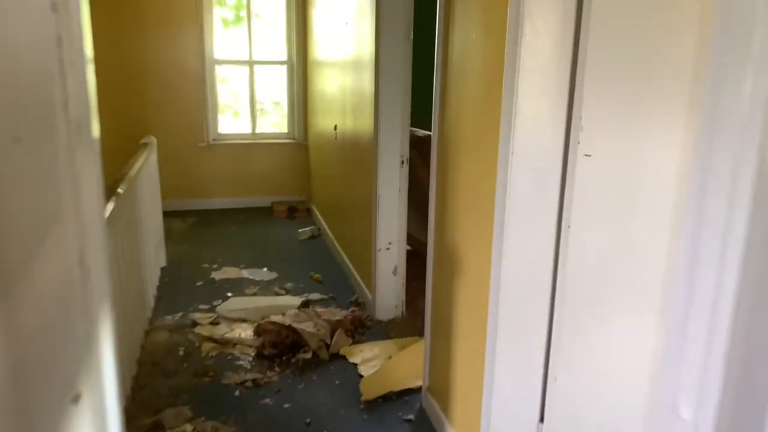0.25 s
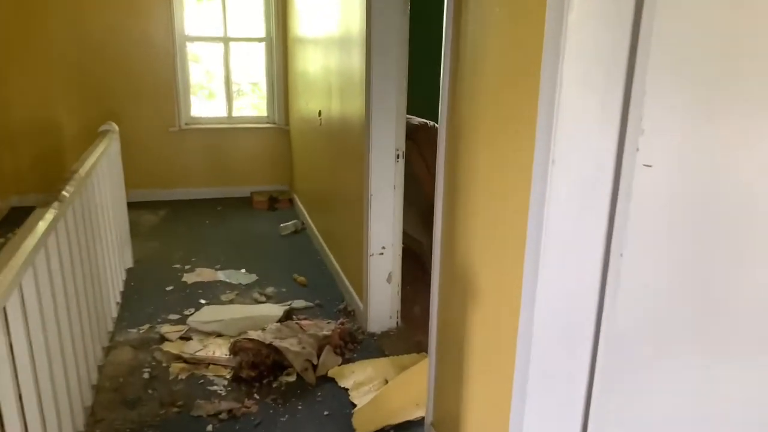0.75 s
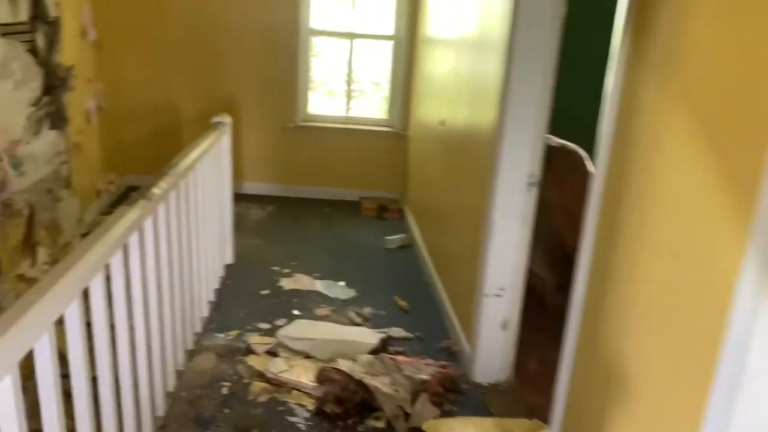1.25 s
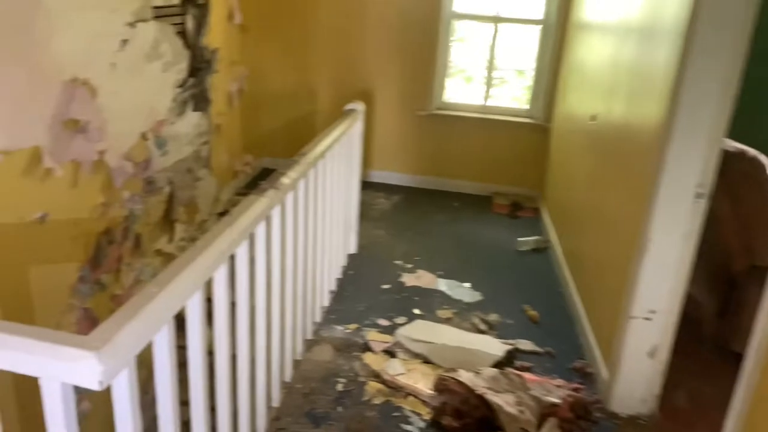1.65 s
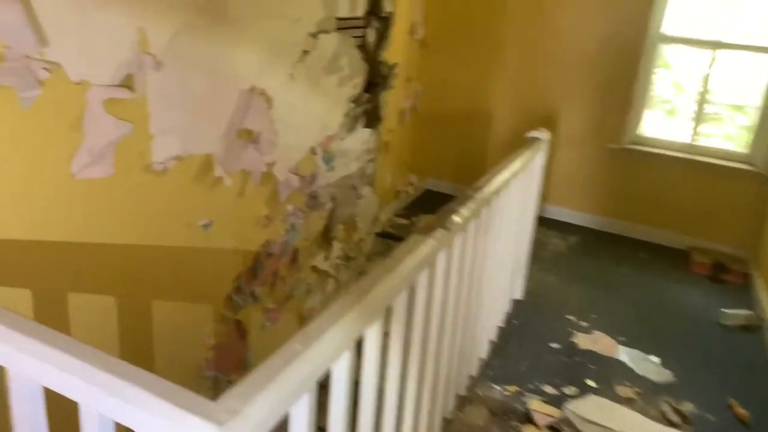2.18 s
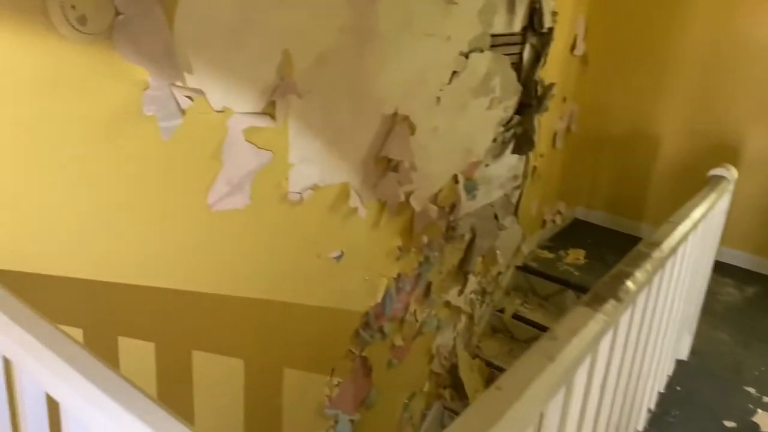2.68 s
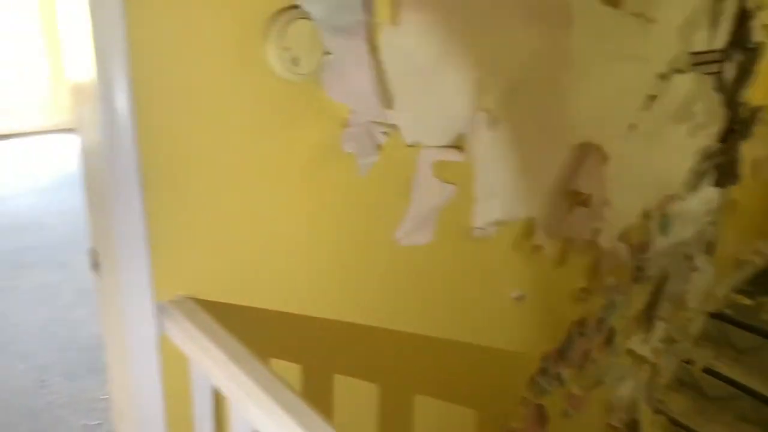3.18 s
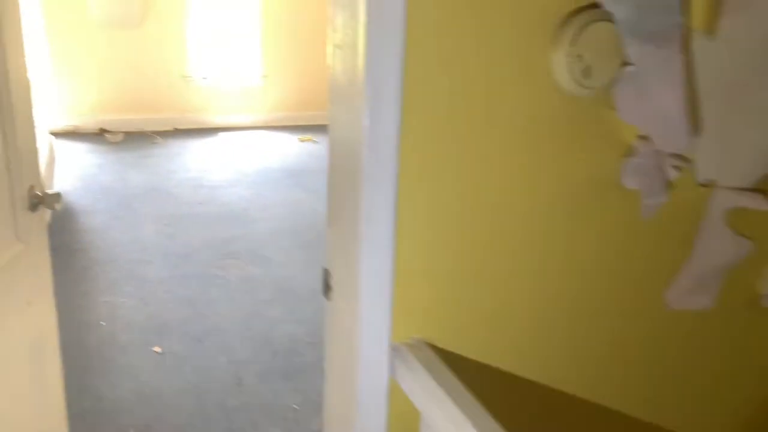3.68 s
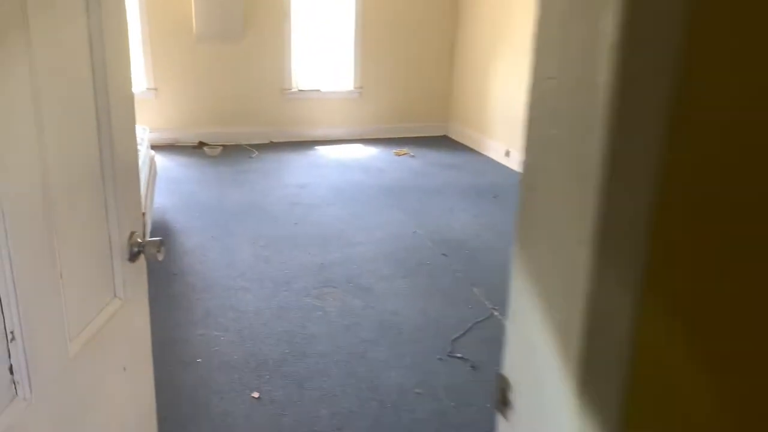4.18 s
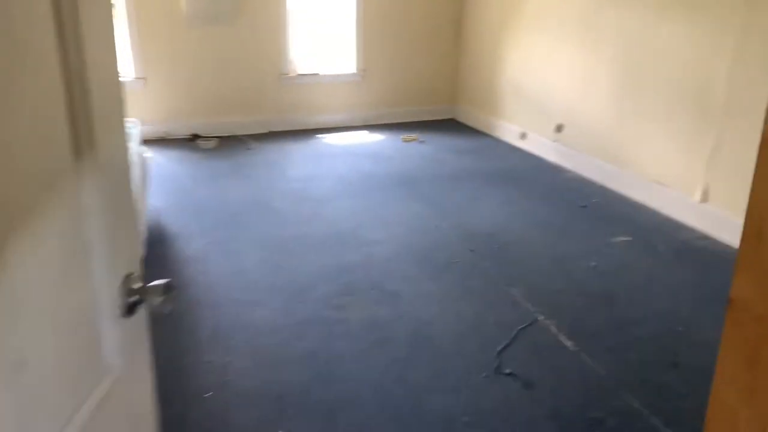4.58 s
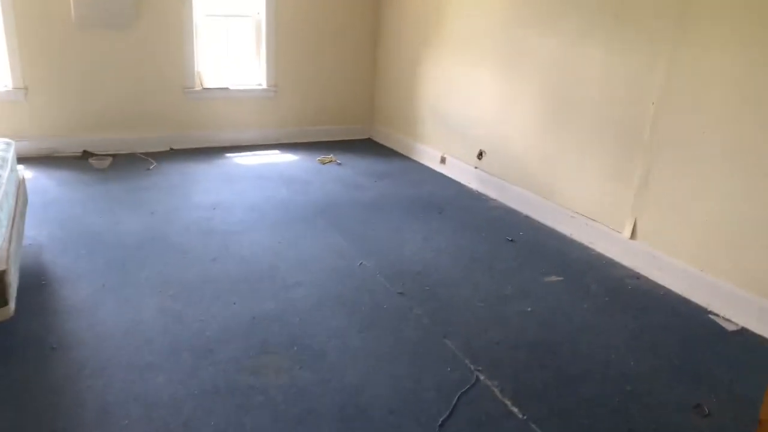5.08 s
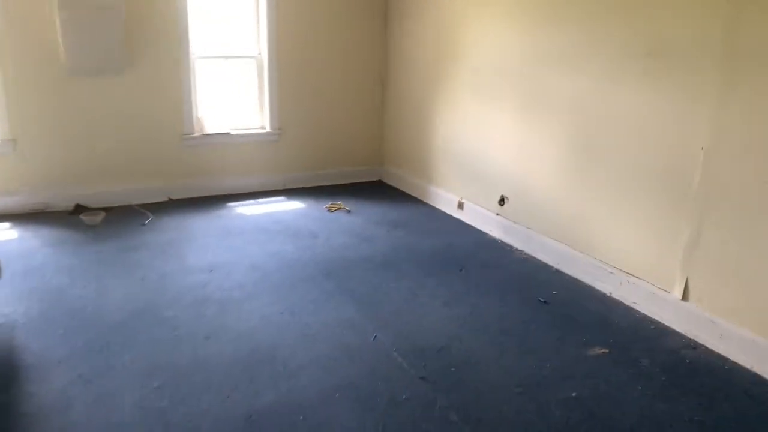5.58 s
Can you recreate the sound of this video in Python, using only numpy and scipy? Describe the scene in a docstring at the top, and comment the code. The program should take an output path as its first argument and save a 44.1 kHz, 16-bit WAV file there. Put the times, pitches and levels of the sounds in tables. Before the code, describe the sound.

On a bare landing, a soft dull footfall leads straight into a loud kick of loose debris, which cracks, bounces and scrapes for under a second. Smaller shoe knocks and scuffs follow, then a light metal jingle near four seconds and faint carpet steps. Short echo off bare walls, heard close from a hand-held phone.

```python
"""Bare landing and empty room, carpet over old floorboards: slow steps, heard from a hand-held phone.
Thuds are short bending tones; knocks and scrapes are clumped grain noise under force envelopes.
A loose piece is kicked and bounces, contacts tick, a small metal part rattles once as decaying sines.
Bare walls return a short noise tail; joists rumble, shaped noise gives faint house air and microphone hiss."""
import sys
import numpy as np
from scipy import signal
from scipy.fft import rfft, irfft, next_fast_len
from scipy.io import wavfile
from scipy.ndimage import uniform_filter1d

SR = 44100
rng = np.random.default_rng(int(sys.argv[2]) if len(sys.argv) > 2 else 0)


def gain_from_db(level_db):
    """Turn a decibel level (scalar or array-like) into a linear amplitude factor."""
    decades = np.asarray(level_db, float) / 20
    return 10 ** decades


def file_out(sig):
    """Save sig as 16-bit WAV at sys.argv[1]."""
    # one column per channel
    cols = np.atleast_2d(sig).T
    # limit, then scale
    lim = np.clip(cols, -1, 1)
    pcm = np.round(lim * 32767).astype(np.int16)
    wavfile.write(sys.argv[1], SR, pcm)


N = 257984
T = np.arange(N) / SR
SIZE = next_fast_len(N + SR)
HZ = np.maximum(np.arange(SIZE // 2 + 1) * SR / SIZE, 1)

# air and hiss spectrum, relative: f/Hz, density/dB per Hz
QUIET_SPECTRUM = [(24, -14.5), (42, 1.5), (70, 6), (140, -11), (400, -20.5), (1000, -27.5), (2500, -34),
                  (6000, -37.5), (9000, -36), (13000, -36.5), (15800, -50.5)]
# wall tail by octave: f/Hz, t60/s, level/dB
ROOM_TAIL = [(140, 0.17, -7.5), (240, 0.53, -2), (544, 0.4, -5), (960, 0.22, -0.5), (1880, 0.18, -8),
             (4530, 0.31, 1), (8000, 0.32, -1.5), (13100, 0.37, -11.5)]
# left-right likeness: f/Hz, likeness/1
LIKENESS = [(60, .94), (170, .99), (350, .88), (600, .6), (1200, .42), (4000, 0), (6000, .2), (8300, .95),
            (16000, .97)]
# strikes of the metal part: t/s, level/dB, tilt/dB per octave
METAL_STRIKES = [(3.9235, -44.5, 1.5), (3.9709, -44.5, 10.5), (3.9932, -45.5, 6), (4.0344, -53, -6),
                 (4.078, -62.5, -6)]
# metal modes: f/Hz, level/dB, t60/s
METAL_MODES = [(3624, 2, 0.15), (5276, -5, 0.16), (7600, -11, 0.16), (7950, -1.5, 0.11), (9130, -4, 0.12),
               (10200, -12, 0.17), (13940, -16, 0.098)]
# soles and the kicked loose piece scraping over carpet and grit:
# t/s, rub/dB, grit against rub/dB, rise/ms, rub f/Hz
SCRAPES = [(0.185, -70.5, -5, 46, 1210), (0.278, -67, -12, 30, 1350), (0.225, -70, -34, 20, 301),
           (0.468, -76, 1, 17, 1360), (0.776, -41, -11.5, 38, 1130), (1.148, -35.5, -26, 35.6, 1310),
           (1.246, -47.5, -46, 69, 617), (1.781, -57, -19.5, 15.7, 1116), (2.149, -69.5, -21.5, 134, 1510),
           (2.41, -58, -25, 65, 618), (2.5, -60.5, -19, 65, 505), (2.61, -63, -35, 30.4, 756),
           (3.56, -65.5, -22, 160, 897), (3.698, -58.5, -16.5, 25.8, 1540), (3.966, -71, 2, 25, 1230),
           (4.29, -80.5, -23.5, 45, 1493), (4.361, -68.5, -8.5, 36, 1350), (4.45, -74.5, -24, 54, 1500),
           (4.558, -71.5, -22, 17, 1380), (5.28, -71.5, -19, 32, 1176), (5.349, -49, -55, 18, 710),
           (5.4, -60, -40, 42, 745), (5.765, -63.5, -50, 26, 472)]
# carpet rub spectrum, relative: f/Hz, level/dB
CARPET_SPECTRUM = [(200, -22.5), (450, 0.5), (900, -3), (1600, 0), (2300, -5), (4000, -38)]
# snap spectrum, relative: f/Hz, level/dB
SNAP_SPECTRUM = [(1300, -16.5), (2200, -0.5), (3000, -4.5), (4300, -7), (6000, -18), (9000, -29.5)]
# grit spectrum, relative: f/Hz, level/dB
GRIT_SPECTRUM = [(2500, -24), (4000, -6), (6500, 1), (8500, -2), (11000, -1.5), (13500, -3), (15800, -18.5)]
# short sharp ticks of contacts, some at the loose piece's landings: t/s, peak/dB, f/Hz
CONTACT_TICKS = [(0.893, -16, 790), (1.156, -12.5, 2270), (1.1565, -9, 740), (1.356, -20.5, 1880),
                 (1.542, -39, 2600), (2.103, -38, 790), (4.149, -51, 674), (2.572, -29, 2720),
                 (3.654, -42.5, 1450), (3.897, -48.5, 1710), (4.597, -55, 7600), (5.339, -41, 3360),
                 (5.341, -37, 1255), (5.786, -54, 2005), (5.787, -52, 3130)]
# wood modes before blow scatter: f/Hz, level/dB, t60/s
WOOD_MODES = [(164.5, 5, 0.11), (240, 1.5, 0.17), (304, -3.5, 0.082), (361, 7, 0.03), (427, 0, 0.078),
              (577, 8.5, 0.025), (623, -2, 0.088)]
# hard contacts of the shoes: t/s, crack/dB, wood/dB, grit/dB, wood f/Hz
SHOE_KNOCKS = [(0.165, -55.5, -40, -50.5, 290), (0.311, -45.5, -45, -54.5, 215),
               (0.508, -56, -93.5, -50, 250), (1.682, -45.5, -45, -63.5, 272),
               (1.748, -33, -57.5, -84, 766), (1.913, -49.5, -42, -73, 313),
               (1.985, -56.5, -43, -79, 200.5), (2.064, -47.5, -29, -66, 455), (2.102, -50, -31, -78, 370),
               (2.379, -36.5, -29.5, -57.5, 240), (2.565, -30.5, -37, -43.5, 240),
               (2.583, -38.5, -30, -52, 413), (2.882, -59.5, -73, -52, 617),
               (3.427, -52.5, -43.5, -61, 242), (3.464, -48, -43.5, -76, 415),
               (3.921, -49.5, -35, -54.5, 272.3), (3.975, -63, -40.5, -66, 315),
               (4.04, -56.5, -40, -78, 287), (4.146, -72, -42.5, -100, 267), (5.336, -34, -27, -61.5, 480),
               (5.761, -71, -44, -97, 380)]
# shoe crack spectrum, relative: f/Hz, level/dB
SHOE_CRACK = [(450, -0.5), (800, 1.5), (1300, -1), (1900, -5), (2600, -10.5), (4000, -37.5)]
# kick and landings of the loose piece: t/s, crack/dB, wood/dB, grit/dB, wood f/Hz
DEBRIS_BOUNCES = [(0.698, -20, -19.5, -24, 646), (0.706, -7.5, -8, -22.5, 432.3),
                  (0.724, -9, -4.5, -20, 340), (0.747, -18.5, -26, -11.5, 374.7),
                  (0.872, -58, -45, -27.5, 383), (0.894, -27.5, -13, -38, 344.2),
                  (0.922, -32, -18, -42, 329), (0.933, -32, -24.5, -37, 435),
                  (0.962, -40.5, -24.5, -63, 406.6), (1.106, -48.5, -28, -41.5, 247),
                  (1.156, -18.5, -19, -18.5, 240), (1.193, -21.5, -22.5, -19.5, 406.2),
                  (1.245, -33, -25, -48, 253.8), (1.354, -21, -26.5, -30, 236.5),
                  (1.541, -31, -41, -25, 356)]
# loose-piece crack spectrum, relative: f/Hz, level/dB
DEBRIS_CRACK = [(550, -3.5), (820, -5.5), (1300, 1), (1900, -6.5), (2900, -8), (4500, -22), (8000, -40)]
# loose-piece modes: f/Hz, level/dB, t60/s
DEBRIS_MODES = [(1761, 0, .07), (2450, -6, .04), (2880, 0, .04), (3069, -4, .035)]
# low thuds of steps and of the kick in the boards: t/s, level/dB, starting f/Hz
FLOOR_THUDS = [(0.1715, -23, 168), (0.705, -20, 240), (0.924, -30, 98), (1.911, -27.5, 177.7),
               (1.973, -44, 123), (2.591, -38.5, 60.8), (3.446, -39.5, 95.7), (3.515, -47, 118),
               (3.611, -43, 81), (3.931, -31, 91), (4.125, -41.5, 222.3), (4.383, -41.5, 98.5),
               (4.552, -55, 110), (4.581, -54.5, 163.5), (4.77, -63, 75.3), (5.286, -41, 172.4),
               (5.324, -38.5, 82.8), (5.749, -56, 203.5)]

DENSE_DB, COARSE_DB, STRIKE_DB = 1.5, 2.5, 4  # spread of grain sizes


def table(points, hz=HZ):
    """Values of (Hz, value) points, joined on a log-frequency axis."""
    f, v = np.transpose(points)
    return np.interp(np.log(hz), np.log(f), v)


def shape(x, gain):
    """Apply a response given per frequency."""
    return irfft(rfft(x, SIZE) * gain, SIZE)[..., :N]


def unit(gain):
    """Scale a response so that white noise keeps its level."""
    return gain / np.sqrt(np.mean(np.abs(gain) ** 2))


def colour(points):
    """Level-keeping response from a (Hz, dB) table."""
    return unit(gain_from_db(table(points)))


def highpass(corner_hz):
    """Steep bass cut."""
    return 1 / (1 + (corner_hz / HZ) ** 4)


def band(low_hz, high_hz):
    """Steep band-pass."""
    return unit(highpass(low_hz) / (1 + (HZ / high_hz) ** 4))


def grains(spread_db):
    """Two unrelated noises of very unequal samples in clumps a few ms long, joint rms 1."""
    clump_db, clump_samples = 3.5, 150
    clumps = np.repeat(rng.standard_normal(N // clump_samples + 1), clump_samples)[:N]
    size_db = spread_db * rng.exponential(size=N) + clump_db * clumps
    x = rng.standard_normal((2, N)) * gain_from_db(size_db)
    return x / x.std()


def pair(mid, side):
    """Left and right as alike as LIKENESS says, from two unrelated signals."""
    alike = np.clip(table(LIKENESS), 0, 1)
    mid = shape(mid, np.sqrt((1 + alike) / 2))
    side = shape(side, np.sqrt((1 - alike) / 2))
    return np.array([mid + side, mid - side])


def ring(modes):
    """Half a second of decaying modes; neighbours swing against each other."""
    t = T[:SR // 2]
    return sum((-1) ** k * gain_from_db(db) * np.sin(2 * np.pi * hz * t) * 1000 ** (-t / t60)
               for k, (hz, db, t60) in enumerate(modes))


def swell(s, ms):
    """Force that starts at s, peaks ms later and dies away."""
    age = np.maximum(T - s, 0) * 1000 / max(ms, .3)
    return age * np.exp(1 - age)


def jolt(s, ms, rise=0.46):
    """Force that sets in over a share of ms and dies away over ms."""
    age = np.maximum(T - s, 0) * 1000 / max(ms, .3)
    return (1 - np.exp(-age / rise)) * np.exp(-age)


def pushes(rows, rise_ms, sag=0):
    """Each push is a tone under a swift rise and fall of force; with sag the pitch falls."""
    out = np.zeros(N)
    for s, db, hz in rows:
        age = np.maximum(T - s, 0)
        rise = age * 1000 / rise_ms
        force = gain_from_db(db) * rise ** 2 * np.exp(2 - 2 * rise)
        out += force * np.sin(2 * np.pi * hz * age / (1 + sag * rise))
    return out


def crunch(forces, body):
    """Grains in three ranges: the dull body, the snap and the grit on top."""
    gains = (body, colour(SNAP_SPECTRUM), colour(GRIT_SPECTRUM))
    return sum(shape(force * grains(COARSE_DB), gain) for force, gain in zip(forces, gains))


def quiet():
    """Faint air of the empty house and hiss of the microphone, as shaped noise."""
    return gain_from_db(-63) * shape(pair(*rng.standard_normal((2, N))), colour(QUIET_SPECTRUM))


def room(x):
    """Dense reflections from bare walls; every octave dies at its own rate."""
    t, tails = T[:SR], 0
    for hz, t60, db in ROOM_TAIL:
        tail = rng.standard_normal((2, SR)) * 1000 ** (-t / t60) * (1 - np.exp(-t / 0.0037))
        tail = tail / np.sqrt(np.mean(np.sum(tail ** 2, axis=1)))
        octave = np.exp(-np.log2(HZ / hz) ** 2)
        tails = tails + gain_from_db(db) * octave * rfft(tail, SIZE)
    return pair(*shape(x, tails))


def joists():
    """Low rumble of the floor frame, set going by every thud."""
    offset_db, thud_share, rise_s, t60_s = -36, 0.48, 0.0085, 1.4  # share of each thud's dB
    load = np.zeros(N)
    for s, db, _ in FLOOR_THUDS:
        age = np.maximum(T - s, 0)
        load += gain_from_db(offset_db + thud_share * db) * (1 - np.exp(-age / rise_s)) * 1000 ** (-age / t60_s)
    return load * shape(grains(DENSE_DB), band(57, 140))


def rattle():
    """Strikes catch the metal modes unequally; pitch starts sharp and settles, each line wavers in phase."""
    waver_rad, waver_samples = .6, 900
    noise = rng.standard_normal((len(METAL_MODES), N))
    shake = waver_rad * np.sqrt(waver_samples) * uniform_filter1d(noise, size=waver_samples)
    out, catch = np.zeros(N), rng.standard_normal((len(METAL_STRIKES), len(METAL_MODES)))
    for (s, db, tilt_db), chances in zip(METAL_STRIKES, catch):
        age = np.maximum(T - s, 0)
        bent = age + 0.0007 * (1 - np.exp(-age / 0.03))
        for (hz, mode_db, t60), chance, waver in zip(METAL_MODES, chances, shake):
            size = gain_from_db(db + mode_db + tilt_db * np.log2(hz / 6000) - 8.0 + 2.0 * chance)
            line = np.sin(2 * np.pi * hz * (1 + 0.0029 * chance) * bent + waver)
            out += size * line * (age > 0) * 1000 ** (-age / t60)
    return out


def scrapes():
    """Soles and the kicked piece rub carpet at each row's pitch, grit gives way in grains, boards grumble."""
    slip_db, slip_samples, focus_db = 3.5, 350, 10  # focus: loss an octave from the rub pitch
    board_db, board_per_grit = -1.5, 0.012  # boards against the rub
    held = np.repeat(rng.standard_normal(N // slip_samples + 1), slip_samples)[:N]
    slip = gain_from_db(slip_db * uniform_filter1d(held, size=100))  # the contact sticks and slips
    fibres = grains(COARSE_DB)
    rub, forces = 0, np.zeros((3, N))
    for s, rub_db, grit_db, ms, hz in SCRAPES:
        drag = gain_from_db(rub_db) * swell(s, ms) * slip
        focus = table(CARPET_SPECTRUM) - focus_db * np.log2(HZ / hz) ** 2
        rub = rub + shape(drag * fibres, unit(gain_from_db(focus)))
        shares_db = np.array([grit_db / 2 + 2.5, grit_db, board_db + board_per_grit * grit_db])
        forces += gain_from_db(shares_db)[:, None] * drag
    snap, grit, board = forces
    crumbs = shape(snap * grains(COARSE_DB), colour(SNAP_SPECTRUM))
    crumbs = crumbs + shape(grit * grains(COARSE_DB), colour(GRIT_SPECTRUM))
    return rub + crumbs + shape(board * grains(COARSE_DB), band(170, 610))


def contact_ticks():
    """Short sharp ticks of contacts, some at the loose piece's landings: very brief pushes."""
    return pushes(CONTACT_TICKS, rise_ms=0.84)


def knocks(rows, contact_ms, crack):
    """Rough bursts ring the wood, crack and crunch grit; returns the sound and the cracking force."""
    softness, scatter = 0.34, .015  # dB of contact time per dB of wood over crack; mode shift share
    grit_rise = 0.81  # in contact times: grit crunches up more slowly
    wood, forces, rough = np.zeros((2, N + SR)), np.zeros((3, N)), grains(DENSE_DB)
    shifts = rng.standard_normal((len(rows), len(WOOD_MODES)))
    for (s, crack_db, wood_db, grit_db, wood_hz), shift in zip(rows, shifts):
        i = int(s * SR)
        ms = contact_ms * gain_from_db(softness * (wood_db - crack_db))
        # a gritty contact also snaps louder
        levels_db = np.array([crack_db, (crack_db + grit_db) / 2 + 0.46, grit_db])
        forces += gain_from_db(levels_db)[:, None] * [jolt(s, ms), jolt(s, ms), jolt(s, ms, grit_rise)]
        # the place of the blow favours modes near its own pitch
        body = ring([(hz * (1 + scatter * k), db - 15.0 * np.log2(hz / wood_hz) ** 2, t60)
                     for (hz, db, t60), k in zip(WOOD_MODES, shift)])
        burst = (jolt(s, 0.29 * ms) * rough)[:, i:i + SR // 4]
        blow = signal.fftconvolve(burst, body[None])
        blow = blow / np.max(np.abs(blow), axis=1, keepdims=True)
        wood[:, i:i + blow.shape[1]] += gain_from_db(wood_db) * blow
    return shape(wood[:, :N], highpass(120)) + crunch(forces, colour(crack)), forces[0]


def debris():
    """The loose piece knocks the floor and rings with its own modes, more than in proportion to force."""
    piece_db, piece_power, contact_ms = 3.5, 1.5, 9.1  # contact at equal crack and wood
    floor, force = knocks(DEBRIS_BOUNCES, contact_ms, DEBRIS_CRACK)
    strike = force ** piece_power * grains(STRIKE_DB)
    return floor + gain_from_db(piece_db) * shape(strike, unit(rfft(ring(DEBRIS_MODES), SIZE)))


def shoe_knocks():
    """Hard contacts of the shoes with the floor."""
    return knocks(SHOE_KNOCKS, 12, SHOE_CRACK)[0]  # contact/ms at equal crack and wood


def thuds():
    """Low thuds of steps and of the kick bend the boards; the pitch sags under the load."""
    return shape(pushes(FLOOR_THUDS, rise_ms=11, sag=0.033), highpass(45))  # sag: share per rise time


def scene():
    """Near sounds, their room tail and the background."""
    metal, rub, ticks = rattle(), scrapes(), contact_ticks()
    piece, shoes, low = debris(), shoe_knocks(), thuds()
    near = pair(*(shoes + piece + ticks + rub + joists())) + metal + low
    # the loose piece lands close by: less room against the direct sound
    to_room = shoes[0] + gain_from_db(-2) * piece[0] + gain_from_db(-9) * ticks + metal + rub[0] + low
    return near + room(to_room) + quiet()


def low_pass(x):
    """Removes everything above the highest recorded frequency."""
    return signal.sosfilt(signal.butter(12, 16800, fs=SR, output="sos"), x)


def record(dry):
    """Treble turns in phase between two microphone ports; range ends are cut, loudest peaks rounded."""
    from_hz, turn_hz, bottom_hz, top_hz = 6400, 4500, 32, 16200  # one full turn every turn_hz
    turn = np.exp(1j * np.pi * np.maximum(HZ - from_hz, 0) / turn_hz)
    turn = turn / (1 + (HZ / top_hz) ** 40)
    ports = shape(dry, np.array([np.conj(turn), turn]))
    rounded = .9 * np.tanh(ports / .9)
    mix = shape(rounded, highpass(bottom_hz))
    return low_pass(mix)


dry = scene()
out = record(dry)
file_out(out)
```